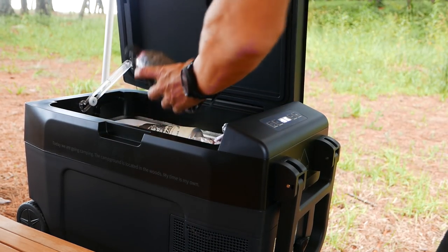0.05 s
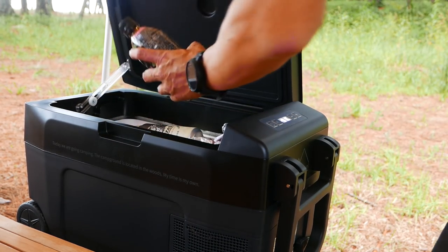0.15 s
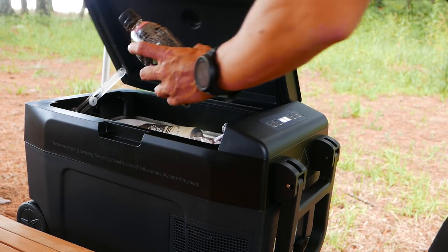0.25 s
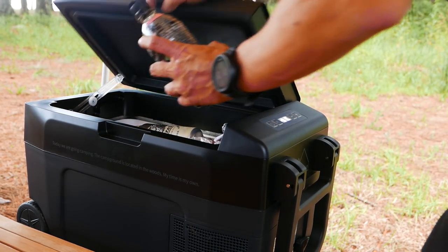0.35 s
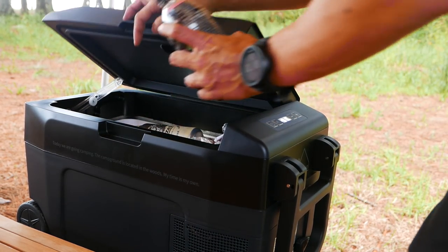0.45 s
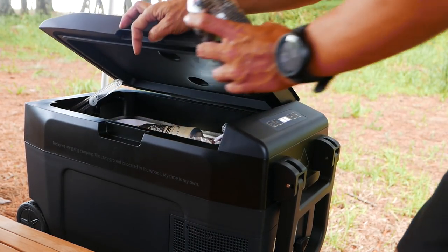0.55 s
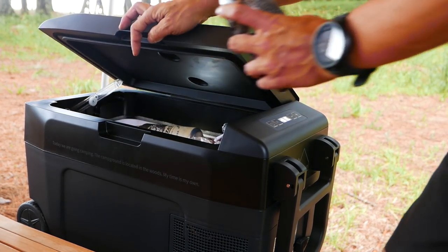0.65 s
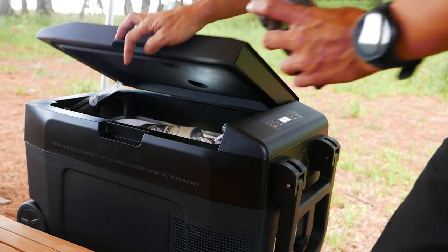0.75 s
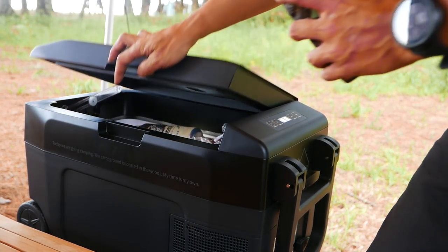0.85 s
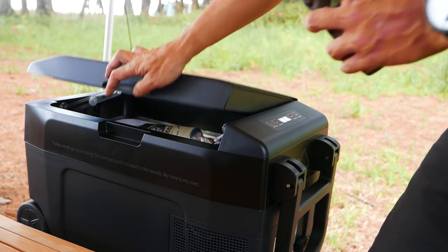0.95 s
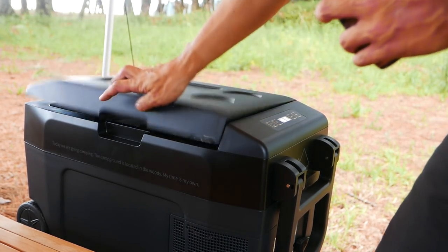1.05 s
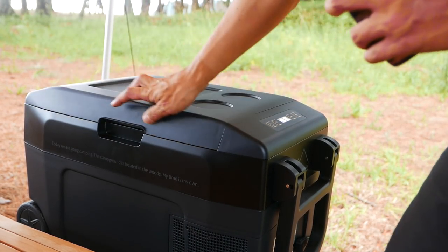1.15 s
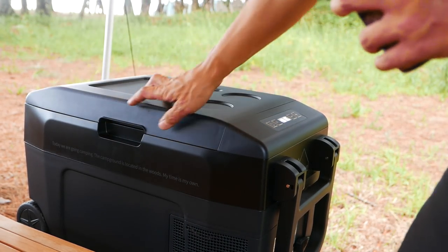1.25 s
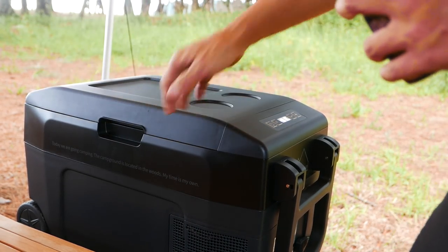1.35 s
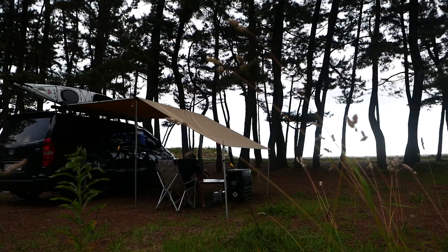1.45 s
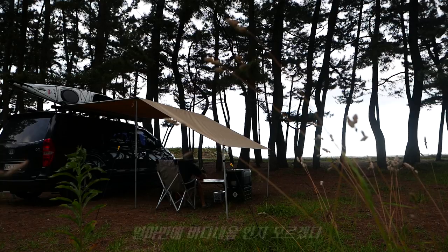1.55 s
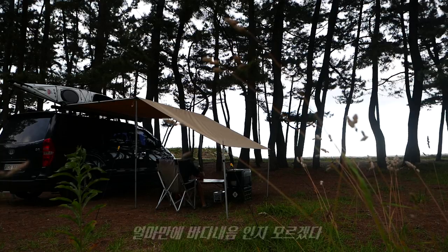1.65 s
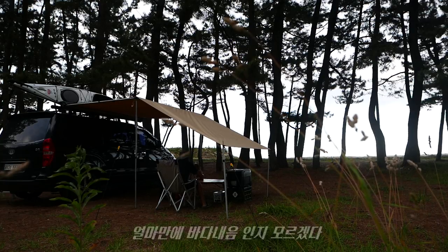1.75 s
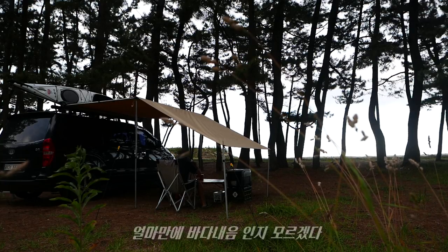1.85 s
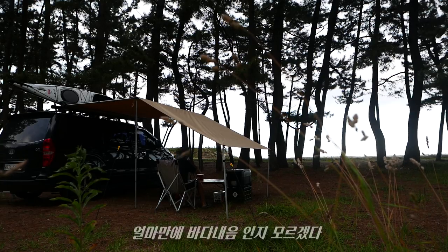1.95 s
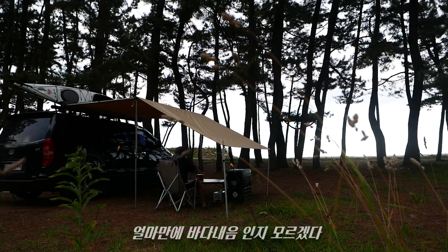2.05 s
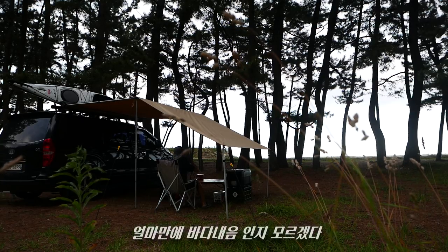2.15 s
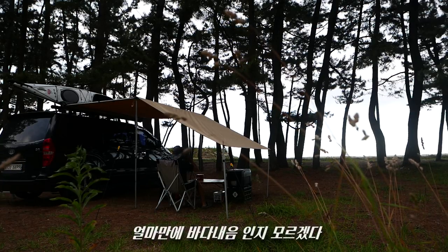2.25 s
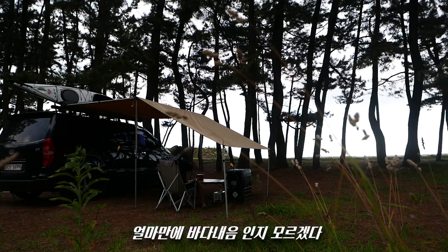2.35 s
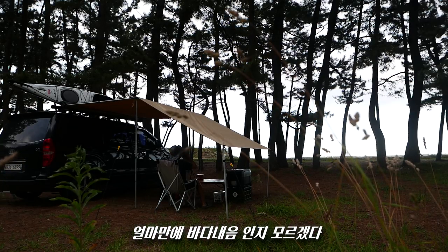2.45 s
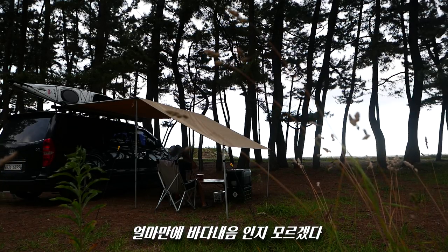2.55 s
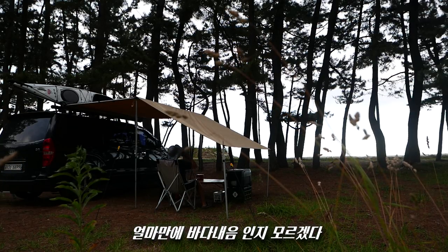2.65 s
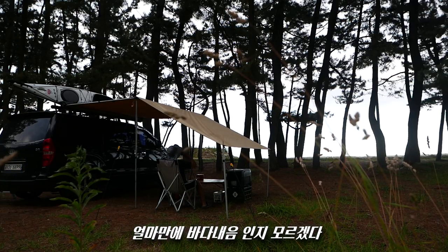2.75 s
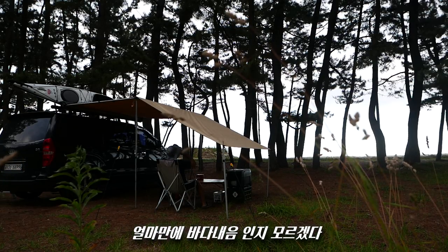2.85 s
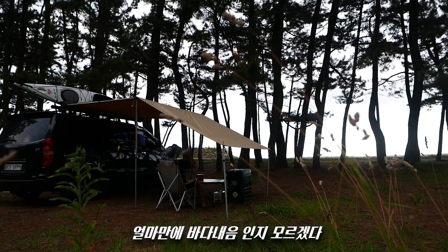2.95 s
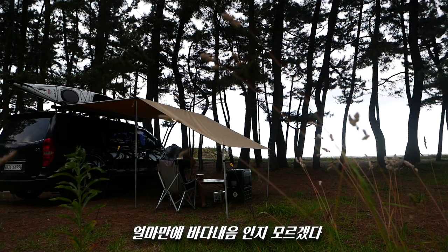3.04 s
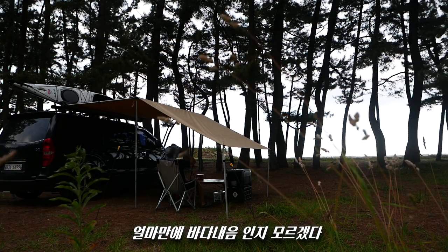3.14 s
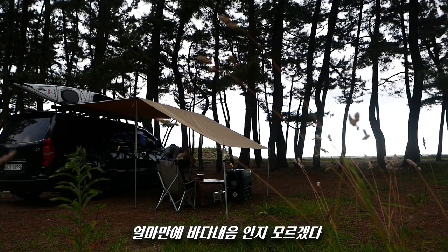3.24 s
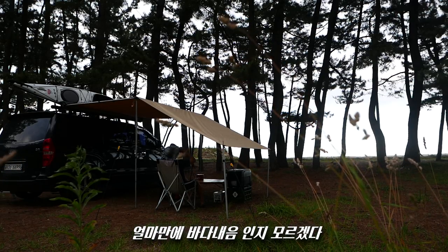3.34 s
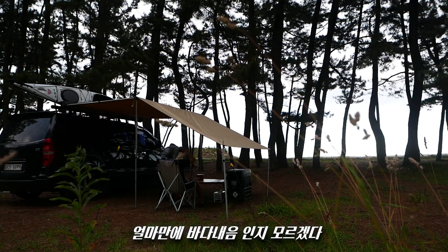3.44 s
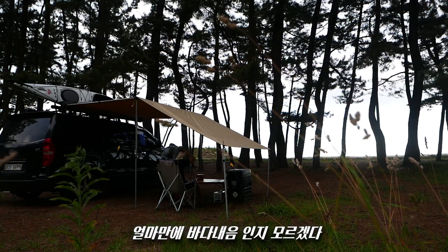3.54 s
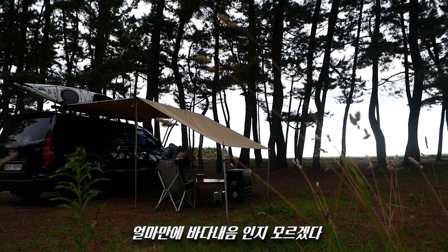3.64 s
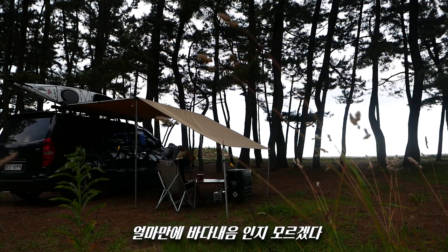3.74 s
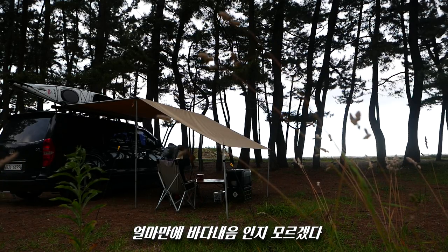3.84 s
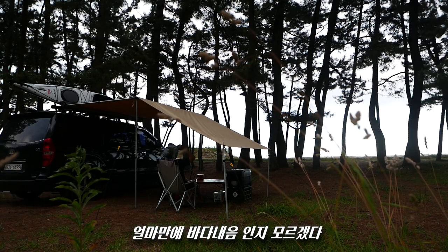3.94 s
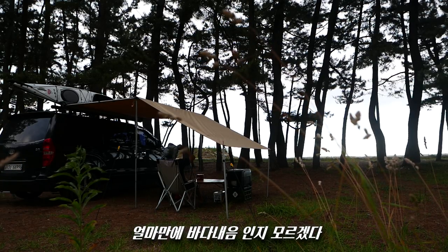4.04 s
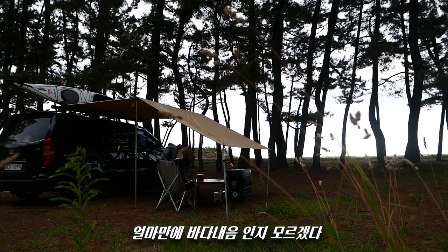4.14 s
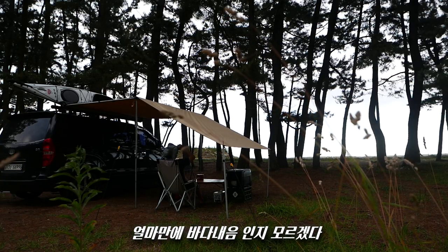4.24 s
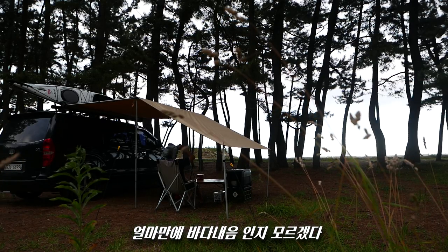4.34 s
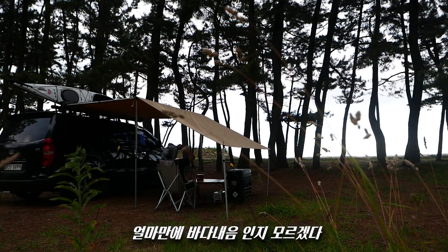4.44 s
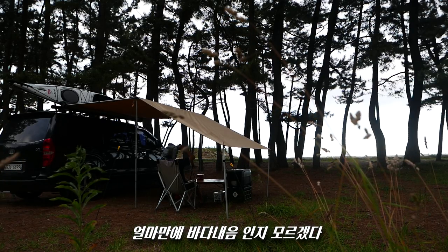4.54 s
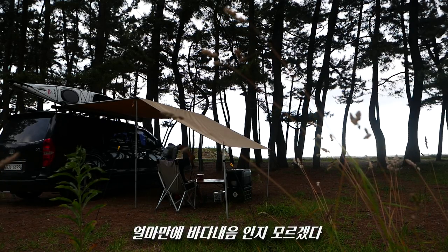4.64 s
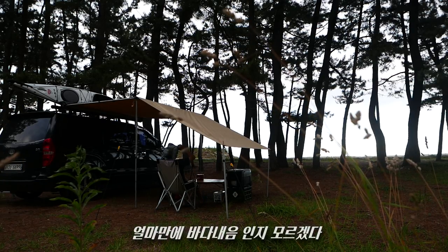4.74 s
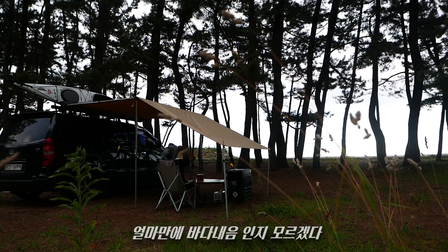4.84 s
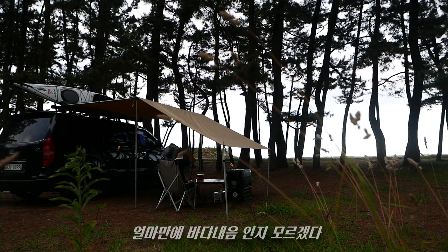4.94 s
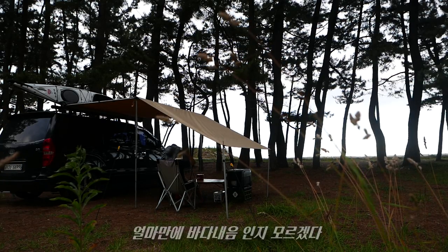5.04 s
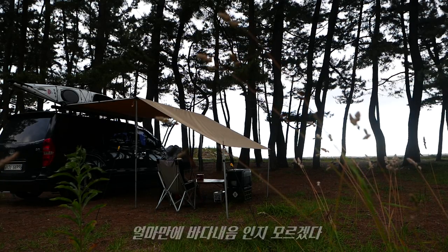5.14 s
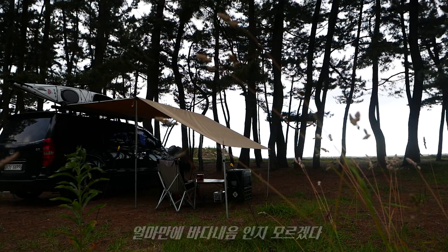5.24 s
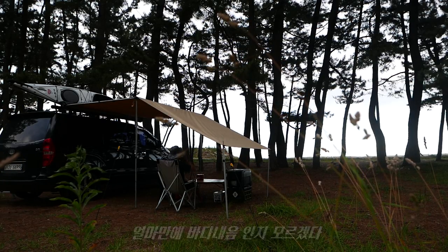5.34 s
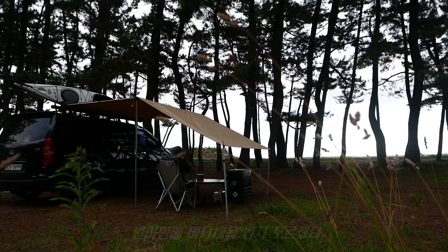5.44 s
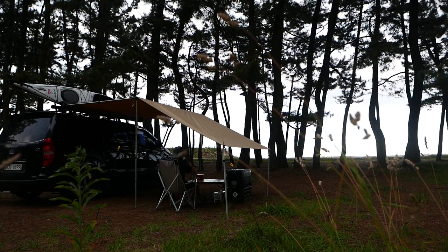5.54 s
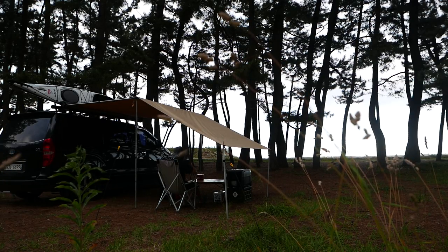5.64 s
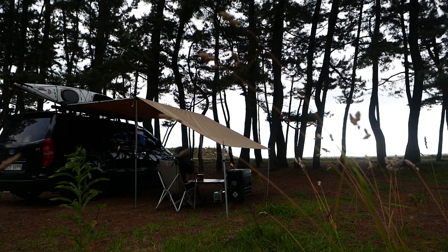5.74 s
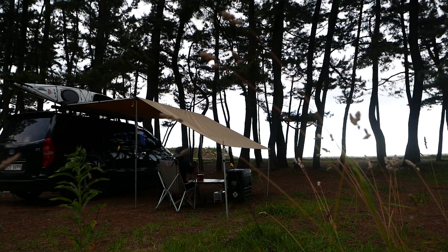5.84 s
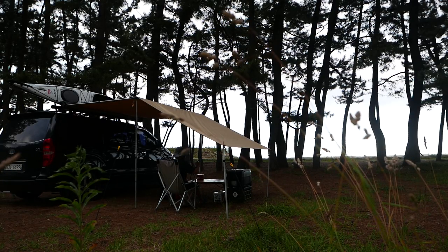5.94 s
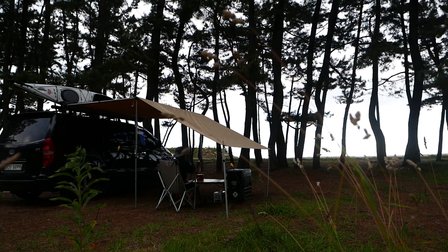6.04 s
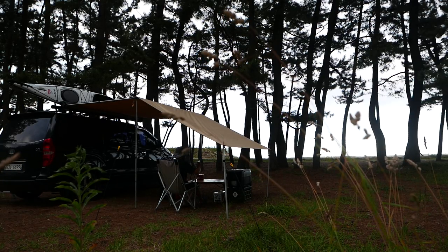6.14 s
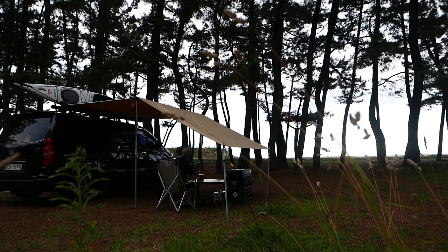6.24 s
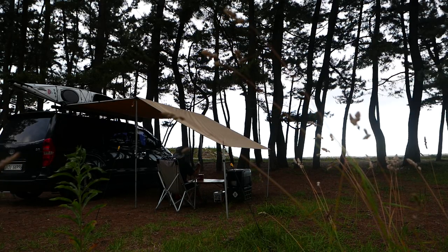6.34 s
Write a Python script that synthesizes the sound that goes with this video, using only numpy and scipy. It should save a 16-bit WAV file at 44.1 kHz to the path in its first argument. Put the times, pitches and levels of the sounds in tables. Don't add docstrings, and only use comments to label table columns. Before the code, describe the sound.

A humming portable fridge, cans clinking, its plastic lid slamming shut; then distant surf, wind in pines, a can tab snapping, a bird singing.

```python
import sys
import numpy as np
from scipy import signal
from scipy.fft import rfft, irfft, next_fast_len
from scipy.io import wavfile
from scipy.ndimage import uniform_filter1d, map_coordinates

SR = 44100
rng = np.random.default_rng(int(sys.argv[2]) if len(sys.argv) > 2 else 0)


def store_pcm(level_fs):
    pcm = np.round(np.clip(level_fs, -1, 1) * 32767).astype(np.int16)
    wavfile.write(sys.argv[1], SR, np.atleast_2d(pcm).T)


def rack_gain(trim_db):
    fader = np.asarray(trim_db, float)
    return 10 ** (fader / 20)


N = 281799
CUT_S = 1.524
TOP_HZ = 15700


def unit(x):
    return x / np.sqrt(np.mean(x ** 2) + 1e-20)


def along(points, hz):
    f, v = np.transpose(points)
    return np.interp(np.log(hz + 1), np.log(f + 1), v)


def curves(rows):
    s, *columns = np.transpose(rows)
    return [np.interp(np.arange(N) / SR, s, column) for column in columns]


def swells(rows, calm_db):
    t = np.arange(N) / SR
    power = rack_gain(calm_db) ** 2
    for s, half, db in rows:
        power = power + rack_gain(db) ** 2 * np.exp(-((t - s) / half) ** 2)
    return 10 * np.log10(power)


def wobble(rate):
    knots = rng.standard_normal(int(N * rate / SR) + 4)
    return map_coordinates(knots, [np.arange(N) * rate / SR])


def filtered(x, response):
    m = next_fast_len(x.shape[-1] + 8192)
    return irfft(rfft(x, m) * response(np.fft.rfftfreq(m, 1 / SR)), m)[..., :x.shape[-1]]


def coloured_noise(spectrum, count):
    return unit(filtered(rng.standard_normal(count), lambda hz: rack_gain(along(spectrum, hz))))


def burst(spectrum, t, t60):
    return coloured_noise(spectrum, len(t)) * rack_gain(-60 * t / t60)


def ring(modes, t, attack, scatter_db):
    out = np.zeros(len(t))
    for hz, db, t60 in modes:
        level = rack_gain(db + scatter_db * rng.normal() - 60 * t / t60)
        out += level * np.sin(2 * np.pi * hz * t)
    return out * (1 - np.exp(-t / attack))


def whistles(notes):
    out, shake, flutter = np.zeros(N), wobble(220), wobble(120)
    for s, length, first_hz, last_hz, db, blur in notes:
        u = np.linspace(0, 1, round(length * SR))
        here = slice(round(s * SR), round(s * SR) + len(u))
        hz = (first_hz + (last_hz - first_hz) * u) * (1 + 0.03 * blur * shake[here])
        level = rack_gain(db + 3 + 2.7 * blur * flutter[here]) * np.abs(np.sin(np.pi * u)) ** 0.22
        add(out, s, level * np.sin(2 * np.pi * np.cumsum(hz) / SR))
    return out


def add(track, s, x):
    place = track[round(s * SR):][:len(x)]
    place += x[:len(place)]


def panned(x, lean_db):
    return x * rack_gain(np.array([lean_db / 2 + np.zeros(N), -lean_db / 2 + np.zeros(N)]))


def echoes(x, t60):
    t = np.arange(SR // 3) / SR
    tail = rng.standard_normal((2, len(t))) * rack_gain(-60 * t / t60)
    late = np.pad(x, (90, 0))[None]
    return signal.fftconvolve(late, tail / np.linalg.norm(tail[0]), axes=1)[:, :N]


# frequency in Hz, likeness from 0 to 1.
LIKENESS = [(60, 0.17), (150, 0.77), (380, 0.42), (950, 0.51), (2380, 0.56), (5980, 0.57), (15000, 0.33)]


def rush(spectrum, patchy_db, lean_db):
    z = signal.stft(rng.standard_normal((2, N + 512)), nperseg=512)[2]
    field = uniform_filter1d(rng.standard_normal(z.shape[1:]), size=6, axis=0)
    field = uniform_filter1d(field, size=12, axis=1)
    pair = signal.istft(z * rack_gain(patchy_db * unit(field)), nperseg=512)[1][:, :N]

    def mid_side(hz):
        turn = np.arccos(np.clip(along(LIKENESS, hz), -1, 1)) / 2
        return rack_gain(along(spectrum, hz)) * [np.cos(turn), np.sin(turn)]

    mid, side = filtered(pair, mid_side)
    both = panned(np.array([mid + side, mid - side]), lean_db)
    return both / np.sqrt(np.mean(both.mean(axis=0) ** 2))


# frequency in Hz, density in dB per Hz.
RUMBLE_COLOUR = [(15, -66), (25, -36), (36, -38), (49, -24), (65, -20), (81, -10.5), (168, 0.5),
                 (300, -6.5), (390, -39), (660, -120)]
SURF_COLOUR = [(150, -23), (250, -6), (313, -5.5), (345, -1.5), (428, -5), (614, -3), (1180, -7),
               (1390, -13), (1700, -18), (2210, -25.5), (3740, -120)]
NEEDLE_COLOUR = [(880, -23.5), (1500, -1), (1660, -2.5), (2510, -2.5), (3700, -5), (4410, -8.5),
                 (6640, -12), (7600, -15.5), (9880, -19), (16700, -120)]
HISS_COLOUR = [(4350, -26), (7400, -8), (8470, -2.5), (9640, 1), (11600, -1.5), (14800, -5), (15500, -10),
               (16000, -19)]
# time in seconds, level in dB.
WIND = [(0, -57), (.36, -55.5), (.52, -60.5), (.95, -59.5), (1.4, -60), (1.515, -57), (1.53, -54),
        (1.75, -55.5), (2.1, -54.5), (2.4, -56), (2.65, -54.5), (3.2, -57), (3.7, -58.5), (4.0, -59.5),
        (4.75, -62.5), (5.4, -61), (5.85, -60.5), (6.39, -62)]
# time in seconds, surf level in dB, left over right in dB.
SEA = [(0, -48, 8), (.5, -49, 7.5), (1.5, -50.5, 6), (1.7, -48.5, 6), (2.3, -49, 2), (3.1, -49, 4.5),
       (3.9, -50.5, 6.5), (4.75, -50, 7.5), (5.4, -49, 5.5), (5.87, -49.5, 8.5), (6.1, -49, 11),
       (6.39, -46.5, 10)]
# middle in seconds, half length in seconds, level in dB.
GUSTS = [
    (0, 0.36, -57),
    (.51, 0.22, -55),
    (1.65, .2, -53),
    (2.25, 0.61, -53.5),
    (2.9, 0.32, -59),
    (3.75, 0.47, -56.5),
    (4.85, .15, -70),
    (5.35, .35, -56),
    (6.42, 0.18, -54),
]
# middle in seconds, half length in seconds, level in dB.
RUSTLES = [
    (.33, .08, -71),
    (1.07, .05, -74),
    (1.3, 0.035, -69),
    (1.72, 0.11, -67),
    (2.0, .25, -75),
    (6.38, .05, -78),
]


def outdoors():
    calm_db, hiss_db = -59.5, -75.5
    wind_hiss_db, hiss_follows = -76, 0.62
    (needles_db,), (surf_db, lean_db) = curves(WIND), curves(SEA)
    raised = rack_gain(wind_hiss_db + hiss_follows * (needles_db - needles_db.mean()))
    hiss_level = np.hypot(rack_gain(swells(RUSTLES, hiss_db)), raised)
    swell = wobble(2.68)
    rumble_level = rack_gain(swells(GUSTS, calm_db) + 1.25 * wobble(9))
    surf_level = rack_gain(surf_db + 1.32 + 0.3 * swell + 0.32 * wobble(14))
    needle_level = rack_gain(needles_db + 0.65 + 0.5 * swell + 0.34 * wobble(13))
    rumble = rumble_level * rush(RUMBLE_COLOUR, patchy_db=1.5, lean_db=0.99 * lean_db)
    surf = surf_level * rush(SURF_COLOUR, patchy_db=0.89, lean_db=1.03 * lean_db)
    needles = needle_level * rush(NEEDLE_COLOUR, patchy_db=0.6, lean_db=0.092 * lean_db)
    hiss = hiss_level * rush(HISS_COLOUR, patchy_db=1 / 3, lean_db=.1)
    return rumble + surf + filtered(needles + hiss, lambda hz: hz < TOP_HZ)


# frequency in Hz, density in dB per Hz.
THUMP_COLOUR = [(300, -120), (450, 2), (600, 0), (850, -4), (1300, -120)]


def wave():
    start_s, rise_s, level_db, grows_db_per_s = 5.85, 0.18, -51.5, 1
    since = np.arange(N) / SR - start_s
    level = np.clip(since / rise_s, 0, 1) ** 2 * rack_gain(level_db + grows_db_per_s * since)
    return level * rush(THUMP_COLOUR, patchy_db=-2.5, lean_db=16)


# frequency in Hz, level in dB.
ENGINE = [(50, -86), (69, -76)]


def far_engine():
    t = np.arange(N) / SR
    tones = np.zeros(N)
    for hz, db in ENGINE:
        level = rack_gain(db + 1 + 4.4 * wobble(3))
        turns = np.cumsum(hz * (1 + 0.012 * wobble(1.3))) / SR
        tones += level * np.sin(2 * np.pi * turns)
    return panned(tones * np.clip((t - CUT_S) / 2.7, 0, 1), 23)


# start in
# seconds, length in seconds, first pitch in Hz, level in dB.
CHIRPS_AND_CLINKS = [(.142, 0.018, 4950, -63), (.158, .028, 4220, -61), (.427, .014, 3220, -53),
                     (.847, 0.04, 4560, -65), (.868, 0.027, 4950, -61.5), (.882, 0.017, 4170, -61),
                     (.892, .018, 3900, -57), (.9, .048, 5000, -69), (.908, .024, 3330, -59),
                     (.975, 0.053, 4400, -73), (1.645, 0.063, 3450, -56), (1.73, .025, 3520, -63),
                     (1.95, 0.043, 4450, -64), (1.995, .03, 4370, -59), (2.028, 0.034, 3840, -59),
                     (2.063, .04, 3700, -72)]
SONG = [(5.515, 0.026, 3700, -69), (5.555, .025, 3500, -70), (5.625, .02, 3780, -61),
        (5.655, 0.034, 3430, -63), (5.69, 0.026, 3550, -61), (5.71, 0.023, 3430, -53.5),
        (5.728, 0.017, 4040, -52), (5.745, .015, 4700, -66), (5.756, .012, 5100, -64.5),
        (5.764, 0.041, 5520, -61), (5.81, 0.069, 5420, -62), (5.832, .05, 4320, -71),
        (5.895, .05, 4190, -70), (5.899, .03, 5290, -68), (5.94, .02, 4720, -65), (5.969, 0.022, 4550, -62),
        (6.0, 0.044, 4830, -66), (6.058, 0.073, 4790, -69), (6.125, .025, 4280, -70),
        (6.148, 0.05, 4140, -61.5), (6.2, .018, 4090, -60)]
SWOOPS = [
    (4.207, .03, 8150, -72),
    (4.37, .04, 5000, -74),
    (5.075, .04, 5000, -73),
]


def bird():
    droop_hz_per_s, swoop_hz_per_s = 1300, 22000
    chirp_clear_s, song_clear_s = .019, .01
    slur_gap_s, slur_share = .003, .25
    rows = []
    for notes, fall, clear, slurs in (
        (CHIRPS_AND_CLINKS, droop_hz_per_s, chirp_clear_s, False),
        (SONG, droop_hz_per_s, song_clear_s, True),
        (SWOOPS, swoop_hz_per_s, chirp_clear_s, False),
    ):
        for (s, length, hz, db), after in zip(notes, notes[1:] + notes[:1]):
            last_hz = hz - fall * length
            if slurs and abs(s + length - after[0] - slur_gap_s) < 2 * slur_gap_s:
                last_hz = hz + slur_share * (after[2] - hz)
            rows.append((s, length, hz, last_hz, db, min(1, clear / length)))
    return whistles(rows)


# frequency in Hz, density in dB per Hz.
SNAP_COLOUR = [(410, -30), (700, 1), (1630, -12), (2210, -9), (3750, -2), (6540, -11), (7170, 2.5),
               (8400, -6), (12200, -8.5), (15400, -17), (16500, -34)]
# frequency in Hz, level in dB, t60 in seconds.
CAN_MODES = [(2270, 0, 0.028), (3210, -6, 0.028), (3760, -2, .02), (4600, -5, 0.023), (7000, -4, 0.032),
             (7600, -12, .03), (9400, -10, 0.054)]
# start in seconds, level in dB, t60 in seconds.
BREAK = (1.7115, -21, .014)
# start in seconds, level in dB, t60 in seconds, share of can ring.
OPENING = [
    (1.7122, -26, 0.029, 0.7),
    (1.722, -36, 0.043, .3),
    (1.725, -53, 0.61, .01),
    (1.79, -56, .3, .01),
]


def tab():
    out, t = np.zeros(N), np.arange(SR // 4) / SR
    rise = 1 - np.exp(-t / 0.00011)
    break_s, break_db, break_t60 = BREAK
    add(out, break_s, rack_gain(break_db) * burst(SNAP_COLOUR, t, break_t60) * rise)
    for s, db, t60, share in OPENING:
        noise = burst(SNAP_COLOUR, t, t60) * rise
        can = ring(CAN_MODES, t, attack=0.00025, scatter_db=3.0)
        add(out, s, rack_gain(db) * (noise + share * can))
    return out


# start in seconds, level in dB, pitch in Hz, t60 in seconds, pitch rise as a share.
CLINKS = [
    (.055, -46, 2870, 0.056, 0.036),
    (.323, -42, 2270, .04, 0),
    (0.498, -38, 1310, .025, .05),
]
# start in seconds, level in dB, low edge in Hz, high edge in Hz, t60 in seconds.
TICKS = [(.056, -47, 1800, 4100, 0.054), (.285, -46.5, 4800, 11600, 0.031), (.324, -43.5, 1800, 3980, .03),
         (.45, -52, 2800, 7000, .03), (.487, -48, 2100, 3200, .025), (.499, -34, 1100, 2140, 0.037),
         (1.411, -57, 2430, 6000, .04), (1.525, -56, 3000, 9000, 0.065), (1.655, -57, 8000, 14100, 0.052),
         (6.254, -45, 500, 1200, .03), (6.35, -58, 5000, 13000, .03)]
# start and length in seconds, first and last pitch in Hz, level in dB.
GURGLES = [
    (0.501, 0.0094, 1340, 1395, -34),
    (0.51, 0.0177, 1470, 2140, -44.5),
]


def cans():
    out, t = np.zeros(N), np.arange(SR // 5) / SR
    soft = (1 - np.exp(-t / 0.00039)) ** 2
    for s, db, hz, t60, rise in CLINKS:
        turns = np.cumsum(hz * (1 + rise * np.minimum(t / 0.011, 1))) / SR
        add(out, s, rack_gain(db - 60 * t / t60) * np.sin(2 * np.pi * turns) * soft)
    for s, db, low_hz, high_hz, t60 in TICKS:
        band = [(low_hz / 2, -120), (low_hz, 0), (high_hz, -3), (high_hz * 2, -120)]
        add(out, s, rack_gain(db) * soft * burst(band, t, t60))
    return out + whistles([row + (.3,) for row in GURGLES])


# frequency in Hz, width in Hz, level in dB.
CABINET = [(249, 45, -11), (383, 36, 2), (434, 39, -0.5)]
# frequency in Hz, level in dB, left over right in dB, unsteadiness in dB.
COMPRESSOR = [(59.2, -68.5, 12, .7), (345, -67, 3, 4)]


def fridge():
    fan_db, shut_s, shut_loss_db = -50, 1.15, 4

    def cabinet(f):
        response = 0
        for k, (hz, width, db) in enumerate(CABINET):
            mode = 1j * f * width / (hz * hz - f * f + 1j * f * width)
            response = response + (-1) ** k * rack_gain(db) * mode
        return response

    t = np.arange(N) / SR
    near = np.clip((CUT_S + 0.16 - t) / .3, 0, 1)
    draught_db = fan_db - shut_loss_db * (t > shut_s) + 1.0 + 2.6 * wobble(11.1)
    out = panned(unit(filtered(rng.standard_normal(N), cabinet)) * rack_gain(draught_db) * near, 2.3)
    for hz, db, lean_db, shake_db in COMPRESSOR:
        level = rack_gain(db + shake_db * wobble(4.4)) * np.sqrt(2)
        out += panned(level * np.sin(2 * np.pi * hz * t), lean_db)
    return out


# frequency in Hz, level in dB, t60 in seconds.
SHELL_MODES = [(84, -14.5, 0.083), (166, -25, 0.2), (196, -0.5, 0.17), (258, -0.5, 0.082), (288, -5, 0.047),
               (307, 5.5, 0.056), (335, 8.5, 0.1), (376, -11, 0.19), (445, -7, 0.097), (555, 7, 0.078),
               (605, -2, 0.125), (668, -4, 0.11), (870, -1.5, 0.13), (956, -7, 0.16), (1140, -1.5, 0.064),
               (1164, 1, 0.06), (1330, -9.5, 0.028), (1475, -2, 0.071)]
# frequency in Hz, density in dB per Hz.
SLAP_COLOUR = [(410, -39), (700, -0.5), (2050, -10), (3410, -13.5), (4430, -21), (7010, -21.5), (8650, -29),
               (11800, -33), (16000, -58)]
GASP_COLOUR = [(1470, -37), (2500, 1), (3830, -6), (4800, -8), (5390, -8), (7710, -10), (13800, -13),
               (16000, -26)]
# start in seconds, ring level in dB, seal crack level in dB.
LANDINGS = [
    (1.1521, -10.5, -16),
    (1.1655, -27, -38),
    (1.176, -29, -42),
    (1.183, -22.5, -32),
    (1.188, -22.5, -34),
    (1.201, -28, -38),
    (1.206, -26, -46),
    (1.22, -36, -56),
]
# time in seconds, level in dB.
PUFF = [
    (1.065, -80),
    (1.085, -57),
    (1.128, -53),
    (1.138, -67),
    (1.146, -57),
    (1.153, -45),
    (1.19, -67),
    (1.22, -74),
    (1.25, -83),
]
# time in seconds, level in dB.
CLATTER = [
    (1.141, -58),
    (1.15, -35),
    (1.153, -25),
    (1.162, -35),
    (1.19, -36),
    (1.209, -44),
    (1.25, -66),
]


def lid():
    palm_hz, palm_power = 120, .55
    rattle_db, rattle_per_s = 2.4, 300
    out, t = np.zeros(N), np.arange(SR // 3) / SR
    held = [(hz, db, t60 * (palm_hz / hz) ** palm_power) for hz, db, t60 in SHELL_MODES]
    for s, ring_db, crack_db in LANDINGS:
        add(out, s, rack_gain(ring_db) * ring(held, t, attack=0.0036, scatter_db=2))
        add(out, s + 0.00177, rack_gain(crack_db) * burst(SLAP_COLOUR, t, t60=1 / 100))
    for colour, strength, shake_db in (GASP_COLOUR, PUFF, 0), (SLAP_COLOUR, CLATTER, rattle_db):
        level_db = curves([(1.0, -140)] + strength + [(1.4, -140)])[0]
        level_db = level_db + shake_db * wobble(rattle_per_s) + 2
        out += coloured_noise(colour, N) * rack_gain(level_db)
    return filtered(out, lambda hz: (1j * hz / (45 + 1j * hz)) ** 2 * (hz < TOP_HZ))


def scene():
    shut, tins, snap, song = lid(), cans(), tab(), bird()
    near = panned(shut, 0.34) + panned(tins, 1.5) + panned(snap, 3.8)
    near += rack_gain(-12.0) * echoes(shut + tins, t60=0.029) + rack_gain(-17) * echoes(snap, t60=0.09)
    trees = panned(song, 3) + rack_gain(-5) * echoes(song, t60=.3)
    return near + trees + fridge() + far_engine() + outdoors() + wave()


def low_pass(x):
    return signal.sosfilt(signal.butter(12, 16640, fs=SR, output="sos"), x)


# frequency in Hz, width in Hz, level in dB.
TREBLE_DIPS = [(7630, 180, -9), (8340, 220, -10.5)]


def record(dry):
    duck_s, duck_db, duck_in_s, duck_out_s = 1.2, 3, .05, .17

    def treble_response(f):
        dips_db = sum(db / (1 + (2 * (f - hz) / width) ** 2) for hz, width, db in TREBLE_DIPS)
        return rack_gain(dips_db) * (f < 16640)

    t = np.arange(N) / SR
    splice = rack_gain(-6 * np.exp(-((t - CUT_S + .002) / 0.0021) ** 2))
    since = np.maximum(t - duck_s, 0)
    ducking = (1 - np.exp(-since / duck_in_s)) * np.exp(-since / duck_out_s)
    duck = rack_gain(-2 * duck_db * ducking * (since < CUT_S - duck_s))
    return low_pass(filtered(dry, treble_response) * splice * duck)


dry = scene()
out = record(dry)
store_pcm(out)
```